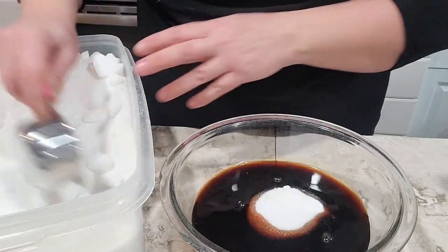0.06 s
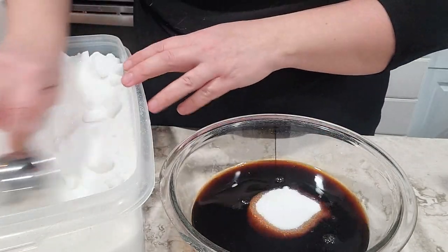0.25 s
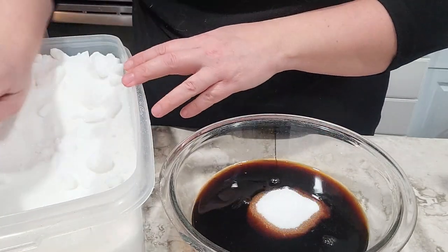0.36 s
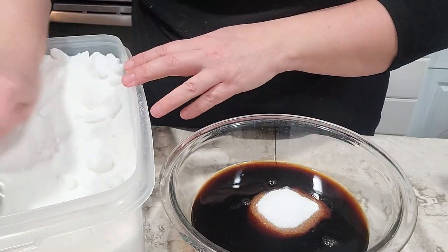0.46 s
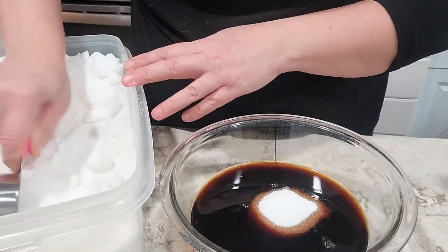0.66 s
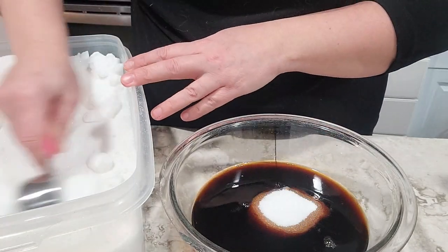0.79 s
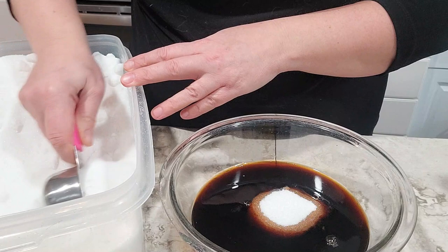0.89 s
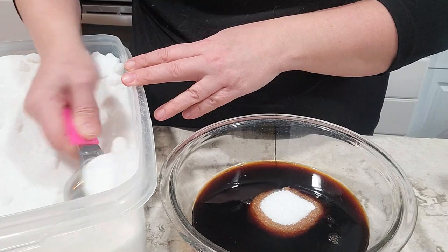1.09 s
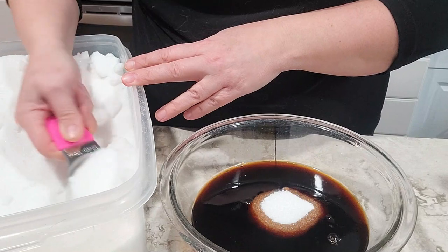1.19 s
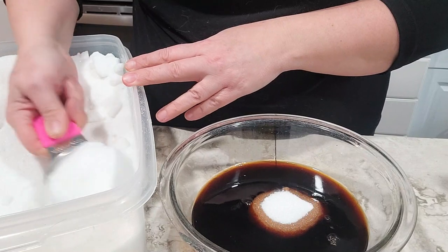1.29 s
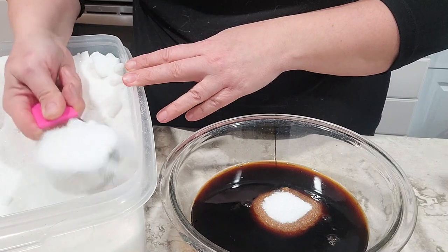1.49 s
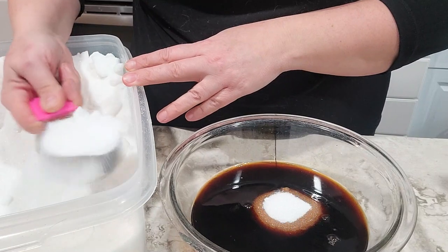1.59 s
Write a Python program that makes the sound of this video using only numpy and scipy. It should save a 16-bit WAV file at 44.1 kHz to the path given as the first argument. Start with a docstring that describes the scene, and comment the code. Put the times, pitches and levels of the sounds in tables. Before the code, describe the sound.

Scooping sugar with a steel cup: brief bright clinks, grainy hiss and crunch, ticks and dull tub knocks.

```python
"""A low room hum and deep booms come first: each shove, probably by shaking the microphone, swells one low tone.
Then an empty steel measuring cup enters sugar in a plastic tub: its clinks are short rings of steel tones.
It digs, fills and lifts through hiss and crunch, made of thousands of tiny random clicks, as its ring is muted.
Sharp ticks, made of clicks and noise bursts, join in, and then knocks on the tub wall, made of ringing tones."""
import sys
import numpy as np
from scipy import signal
from scipy.fft import rfft, irfft, next_fast_len
from scipy.io import wavfile
from scipy.ndimage import uniform_filter1d

SR = 44100
rng = np.random.default_rng(int(sys.argv[2]) if len(sys.argv) > 2 else 0)


def unload_audio(sound):
    """Save the sound as a 16-bit wav file, at the path given as the first command line argument."""
    columns = np.transpose(np.atleast_2d(sound))
    # keep every value between -1 and 1, then stretch to whole-number steps
    steps = np.round(np.clip(columns, -1, 1) * 32767)
    wavfile.write(sys.argv[1], SR, steps.astype(np.int16))


N = 72765  # length in samples

# In all tables, ring time is the time in which a sound falls by 60 dB.


def undb(db):
    """Turn decibels into a gain."""
    return 10 ** (np.asarray(db) / 20)


def unit(x):
    """Scale to an average (rms) level of 1."""
    return x / np.sqrt(np.mean(x ** 2))


def since(start):
    """Seconds since a moment, zero before it."""
    return np.maximum(np.arange(N) / SR - start, 0)


def fade(t, ring_s):
    """Exponential decay that starts once t is positive and falls 60 dB in ring_s seconds."""
    return (t > 0) * np.exp(-np.log(1000) * t / ring_s)


def colour(x, points):
    """Filter to the tone colour drawn by (Hz, dB) points, keeping the power of white noise."""
    size = 2 * next_fast_len(N // 2 + 4096)
    hz, db = np.array(points, float).T
    log_hz = np.log(np.fft.rfftfreq(size, 1 / SR) + 1)
    gain = undb(np.interp(log_hz, np.log(hz), db))
    # Fold the cepstrum so that the filter never sounds before its input.
    cepstrum = irfft(np.log(unit(gain)))
    cepstrum[1:size // 2] *= 2
    cepstrum[size // 2 + 1:] = 0
    return irfft(rfft(x, size) * np.exp(rfft(cepstrum)))[:N]


def walk(rate):
    """Smooth random wander with a spread of 1; a higher rate in Hz wanders faster."""
    k = max(int(SR / rate), 2)
    smooth = uniform_filter1d(rng.standard_normal(N), k, mode="wrap")
    return unit(uniform_filter1d(smooth, k, mode="wrap"))


def ring(modes, t):
    """A struck object sounds as a sum of sine tones that die away."""
    return sum(undb(db) * fade(t, ring_s) * np.sin(2 * np.pi * hz * t) for hz, db, ring_s in modes)


def band(x, hz, q):
    """Broad band-pass: the range of pitches that a contact excites."""
    return signal.lfilter(*signal.iirpeak(hz, max(q, .5), fs=SR), x)


ROOM_DB, ROOM_FALL_DB_PER_S = -36, 3.5  # the air noise slowly eases off
HUM_HZ, HUM_DB = 120.1, -43.5
# Tone colour of the room air. Each row: frequency in Hz, relative level in dB per Hz.
ROOM_COLOUR = [(100, -9.5), (170, -0.5), (240, 0.5), (320, -10.5), (420, -10), (550, -16), (900, -18.5),
               (1800, -26.5), (4000, -32.5), (8000, -36.5), (11000, -43.5), (16000, -57)]


def room():
    """Dull kitchen air is filtered noise; an appliance hum is one steady sine."""
    t = since(0)
    noise = unit(colour(rng.standard_normal(N), ROOM_COLOUR))
    air = undb(ROOM_DB - ROOM_FALL_DB_PER_S * t) * noise
    return air + undb(HUM_DB) * np.sin(2 * np.pi * HUM_HZ * t)


BOOM_HZ, BOOM_RISE_S = 65.85, 0.054
BOOM_WAVER, BOOM_WAVER_HZ = 0.023, 24.4  # spread as a fraction of the pitch, and rate of the wander
RUMBLE_DB = -14
# Shoves that shake the counter. Each row: start in seconds, level in dB, ring time in seconds.
SHOVES = [(-0.02, -24, 0.21), (0.09, -27.5, 0.23), (0.175, -25.5, 0.63), (0.25, -8, 0.63),
          (0.358, -7.5, 0.39), (0.44, -25, 0.43), (0.66, -4.5, 0.25), (0.759, -21.5, 0.083),
          (0.825, -17.5, 0.25), (0.883, -18.5, 0.78), (1.103, -18.5, 0.27), (1.213, -12, 0.21),
          (1.25, -18, 0.68), (1.31, -26, 0.053), (1.51, -32, 0.75)]
# Tone colour of the rumble. Each row: frequency in Hz, relative level in dB per Hz.
RUMBLE_COLOUR = [(20, -33), (32, -2), (42, 17), (55, 34), (80, 2), (110, -21), (200, -65)]


def counter():
    """One deep, slightly wavering resonance swells with each shove and rings down, with a little rumble."""
    swing = np.zeros(N)
    for s, db, ring_s in SHOVES:
        rise = np.sin(np.pi / 2 * np.minimum(since(s) / BOOM_RISE_S, 1)) ** 2
        fall = np.exp(-np.log(1000) * since(s + BOOM_RISE_S) / ring_s)
        swing += undb(db) * rise * fall
    pitch = BOOM_HZ * (1 + BOOM_WAVER * walk(BOOM_WAVER_HZ))
    boom = np.sin(2 * np.pi * np.cumsum(pitch) / SR)
    rumble = unit(colour(rng.standard_normal(N), RUMBLE_COLOUR))
    return swing * (boom + undb(RUMBLE_DB) * rumble)


CRACK_DB, CRACK_RING_S = -28.5, 0.0034
SPRAY_DB, SPRAY_RING_S = -25, 0.066
# Sharp ticks of lumps and cup edge. Each row: start in seconds, level in dB, brightness tilt in dB per octave.
TICKS = [(0.348, -5.5, 6), (0.494, -9.5, -1.5), (0.566, -6.5, -5.5), (0.6445, 4, -4.5), (0.7045, -15, -9),
         (0.787, -6.5, -1), (0.815, -7, -8.5), (0.866, 1.5, 4), (0.885, -3, 2.5), (0.905, 0.5, 4),
         (0.973, -28, -17), (1.0211, 4, 1.5), (1.024, 0, 1), (1.061, -15, 1), (1.2267, 0, -1),
         (1.3012, -4.5, -7), (1.3565, -5, -5.5), (1.3585, -11.5, 12.5), (1.362, -34, 15),
         (1.4075, -29, -10)]
# Tone colour of a tick before its tilt. Each row: frequency in Hz, relative level in dB per Hz.
TICK_COLOUR = [(150, -20.5), (500, -11.5), (1400, 10), (2800, 4), (4500, 2), (6500, -2), (8300, 0.5),
               (10000, -15.5), (16000, -30)]


def ticks():
    """A sharp one-sample snap, a dry crack of noise and a short spray of grains."""
    out = np.zeros(N)
    for s, db, tilt in TICKS:
        t = since(s)
        snap = np.diff((t > 0) * 1., prepend=0)
        strength = undb(CRACK_DB) * fade(t, CRACK_RING_S) + undb(SPRAY_DB) * fade(t, SPRAY_RING_S)
        debris = rng.standard_normal(N) * strength
        tilted = [(hz, level + tilt * np.log2(hz)) for hz, level in TICK_COLOUR]
        out += undb(db) * colour(snap + debris, tilted)
    return out


PUSH_PEAK_S, PUSH_DB = 0.0012, 12  # the contact pulse peaks this long after the start
THUD_DB, THUD_RING_S = -2, 0.056  # the knock's own fade shortens this ring
CONTACT_Q = 1.64  # a low value lets a wide range of pitches through
# Tones of the plastic tub. Each row: frequency in Hz, relative level in dB, ring time in seconds
# before the knock's own fade shortens it.
TUB = [(273, -6, .11), (395, -4, .1), (440, -7, .09), (519, -3, .15), (636, 0, .17), (724, -9, .1),
       (785, -7, .08), (855, -8, .08), (990, -8, .06), (1320, -11, .07), (1845, -9, .08), (2130, -8, .09)]
# Cup against the tub wall. Each row: start in seconds, level in dB, centre of the contact's energy in Hz,
# ring time in seconds of the fade caused by the hand's damping.
KNOCKS = [(0.6458, -9.5, 468, 0.4), (0.6515, -12.5, 654, 0.17), (0.659, -17, 645, 0.16),
          (0.6645, -25, 2050, 0.088), (0.674, -18, 564, 0.081), (0.705, -25, 820, 0.084),
          (0.851, -31, 336, 0.22), (0.865, -23, 344, 0.1), (1.0208, -23, 413, .05), (1.186, -20, 1060, .04),
          (1.2248, -14, 890, 0.027), (1.2745, -17, 795, 0.024), (1.289, -18, 865, 0.022),
          (1.359, -29.5, 540, 0.067), (1.4075, -28.5, 1260, .08)]
# Low tones of the whole loaded tub. Each row: frequency in Hz, relative level in dB, ring time in seconds
# before the bump's own fade shortens it.
BASE = [(117.3, -1, 0.53), (179, -7, 0.17), (220, 2, 0.099)]
# Bumps of the whole tub on the counter. Each row: start in seconds, level in dB, ring time of the fade in seconds.
BUMPS = [(0.648, -16, 1), (1.228, -11, 0.03)]


def knocks():
    """A short push rings the tub wall and the packed sugar thuds; two bumps ring the whole tub."""
    out = np.zeros(N)
    for s, db, hz, ring_s in KNOCKS:
        t = since(s)
        push = undb(PUSH_DB) * t / PUSH_PEAK_S * np.exp(1 - t / PUSH_PEAK_S)
        thud_noise = unit(band(rng.standard_normal(N), hz, CONTACT_Q))
        thud = undb(THUD_DB) * thud_noise * fade(t, THUD_RING_S)
        damped = (ring(TUB, t) + thud) * fade(t, ring_s)
        out += undb(db) * band(push + damped, hz, CONTACT_Q)
    for s, db, ring_s in BUMPS:
        t = since(s)
        out += undb(db) * ring(BASE, t) * fade(t, ring_s)
    return out


CLINK_Q = 4.5  # how narrow a range of pitches each clink excites
# Tones of the steel cup, also used for the rubbing. Each row: frequency in Hz, relative level in dB,
# ring time in seconds.
CUP = [(2798, -5, .25), (3700, -4, .11), (3947, -6, .06), (4950, -2, .035), (5196, 0, .17), (5232, -3, .08),
       (5770, -1, .04), (5881, -2, .06), (6020, -2, .04), (7560, -2, .035), (7720, -4, .04),
       (7881, -4, .08), (8220, -4, .04), (9250, -2, .06), (9518, -7, .1), (10950, -5, .035),
       (13160, -15, .07), (14700, -11, .05)]
# Clinks of the cup. Each row: start in seconds, level in dB, centre of the contact's energy in Hz.
CLINKS = [(0.2263, -26.5, 5600), (0.233, -21.5, 5570), (0.2412, -21.5, 5940), (0.2415, -17, 11200),
          (0.249, -19.5, 5300), (0.253, -21, 3730), (0.267, -20.5, 5940), (0.277, -18.5, 2760),
          (0.353, -20, 4100), (0.362, -28.5, 5360), (0.417, -24.5, 2700)]


def clinks():
    """The empty cup rings as it meets the sugar and catches on lumps."""
    return sum(undb(db) * band(ring(CUP, since(s)), hz, CLINK_Q) for s, db, hz in CLINKS)


GRAINS_PER_S, GRAIN_SPREAD_DB = 7000, 2.5


def grains():
    """Dense tiny clicks at random moments, of unequal size and random sign."""
    present = rng.random(N) < GRAINS_PER_S / SR
    size = undb(GRAIN_SPREAD_DB * np.minimum(rng.exponential(size=N), 6))
    return unit(present * size * rng.choice([-1, 1], N))


EDGE_S = 0.0078  # the rubbing starts and stops this fast
SLIP_HZ, SLIP_DB = 182, 1  # rate and spread of the stick-slip flutter
HISS_DB, CRUNCH_DB, CUP_RUB_DB = -1, -0.5, -3.5  # overall trims
EMPTY_HISS_DB = -1  # the hiss is weaker while the cup only skims the surface
BURIED_S, MUTING_S, MUTED_DB = 0.58, 0.22, -19  # when muting starts, how long it takes, how deep it goes
# The strokes of the cup through the sugar. Each row: time in seconds, level of the fine hiss in dB,
# level of the coarse crunch in dB, both before the overall trims.
ENTER = [(0.236, -32, -39), (0.248, -22, -23), (0.288, -23.5, -28.5), (0.298, -37, -26.5),
         (0.316, -31, -31), (0.332, -38, -52), (0.354, -35, -22.5), (0.366, -28.5, -40.5),
         (0.406, -38.5, -33.5), (0.422, -32.5, -33), (0.488, -36, -37), (0.532, -54.5, -51),
         (0.55, -49, -42)]
REACH = [(0.575, -43, -39), (0.599, -38, -33), (0.639, -29.5, -31.5), (0.65, -30.5, -27),
         (0.672, -34, -27.5)]
DIG = [(0.69, -38, -34.5), (0.724, -42, -35.5), (0.794, -20.5, -35.5), (0.814, -18, -31),
       (0.856, -27.5, -29.5), (0.902, -23, -24), (0.926, -28, -25.5), (0.964, -37, -34),
       (0.972, -35.5, -26), (0.988, -39, -44), (1.012, -40.5, -37)]
FILL = [(1.036, -32, -24.5), (1.058, -21.5, -22), (1.096, -28, -22), (1.132, -41.5, -38),
        (1.158, -36.5, -38.5), (1.186, -30, -26.5), (1.2, -36, -35.5), (1.215, -32.5, -25)]
LIFT = [(1.241, -40.5, -35), (1.272, -44, -31.5), (1.315, -50, -43), (1.38, -52, -46.5), (1.43, -51.5, -53),
        (1.47, -75, -57)]
# Tone colours of the grains. Each row: frequency in Hz, relative level in dB per Hz.
HISS_COLOUR = [(1500, -35), (3000, 6.5), (4400, 3.5), (5800, 5.5), (6900, 3.5), (8200, 5), (9500, 3),
               (11000, -4), (13500, -9), (15800, -16.5)]
CRUNCH_COLOUR = [(120, -18), (330, 4), (600, 1.5), (1000, 3.5), (1500, -1), (2400, 1.5), (3400, -7),
                 (5000, -22.5), (9000, -23.5)]


def sugar():
    """Grains stick and slip along the cup: hiss, crunch, and a steel ring muted as the cup is buried."""
    t = since(0)
    s, hiss_db, crunch_db = np.vstack([ENTER, REACH, DIG, FILL, LIFT]).T
    touching = np.clip(np.minimum(t - s[0], s[-1] - t) / EDGE_S + 1, 0, 1)
    contact = touching * undb(SLIP_DB * walk(SLIP_HZ))
    fine = grains() * contact * undb(np.interp(t, s, hiss_db))
    coarse = grains() * contact * undb(np.interp(t, s, crunch_db))
    buried = np.clip((t - BURIED_S) / MUTING_S, 0, 1)  # 0 is free, 1 is fully muted
    hiss = undb(HISS_DB + EMPTY_HISS_DB * (1 - buried)) * colour(fine, HISS_COLOUR)
    crunch = undb(CRUNCH_DB) * colour(coarse, CRUNCH_COLOUR)
    # The fine grains also set the steel ringing.
    steel = ring(CUP, t)
    rubbing = fine * undb(CUP_RUB_DB + MUTED_DB * buried)
    rubbed = signal.fftconvolve(rubbing, steel / np.linalg.norm(steel))[:N]
    return hiss + crunch + rubbed


KITCHEN_RING_S, KITCHEN_DB, KITCHEN_DELAY_S = 0.23, -13, 0.015


def scene():
    """The scoop close by, its faint kitchen echo, the counter and the room."""
    near = sugar() + clinks() + knocks() + ticks()
    walls = rng.standard_normal(N) * fade(since(KITCHEN_DELAY_S), KITCHEN_RING_S)
    echo = signal.fftconvolve(near, walls / np.linalg.norm(walls))[:N]
    return (near + undb(KITCHEN_DB) * echo + counter() + room())[None]


LOW_CUT_HZ, TOP_HZ = 34, 15900


def record(dry):
    """The recorder drops the deepest bass, clips at full scale and cuts the top."""
    low_cut = signal.butter(4, LOW_CUT_HZ, "high", fs=SR, output="sos")
    top_cut = signal.ellip(10, .2, 80, TOP_HZ, fs=SR, output="sos")
    lean = signal.sosfilt(low_cut, dry)
    return signal.sosfilt(top_cut, np.clip(lean, -1, 1))


dry = scene()
out = record(dry)
unload_audio(out)
```